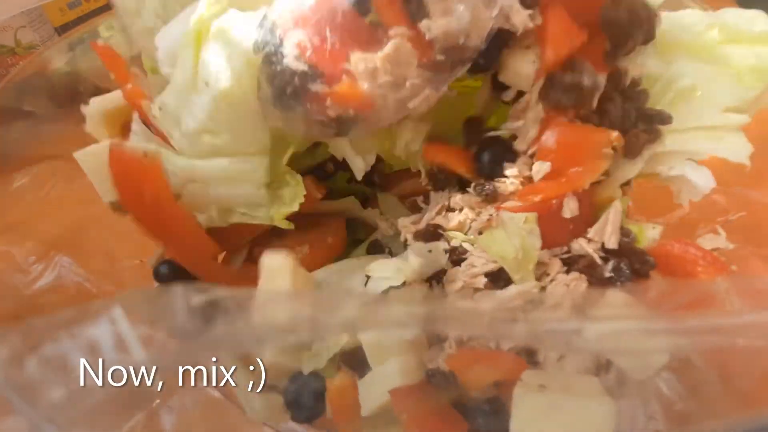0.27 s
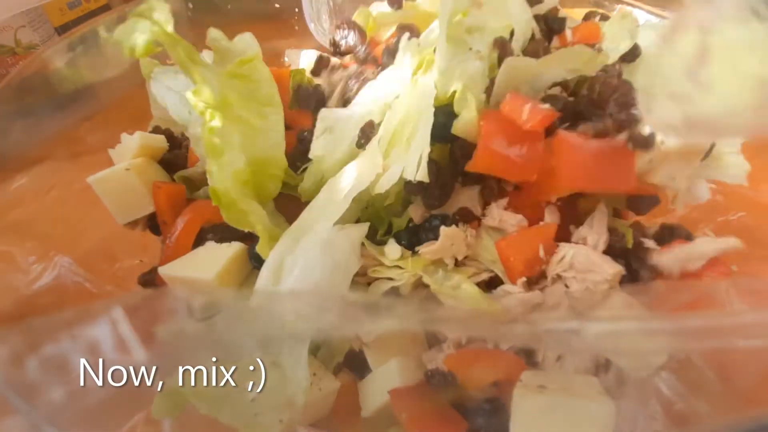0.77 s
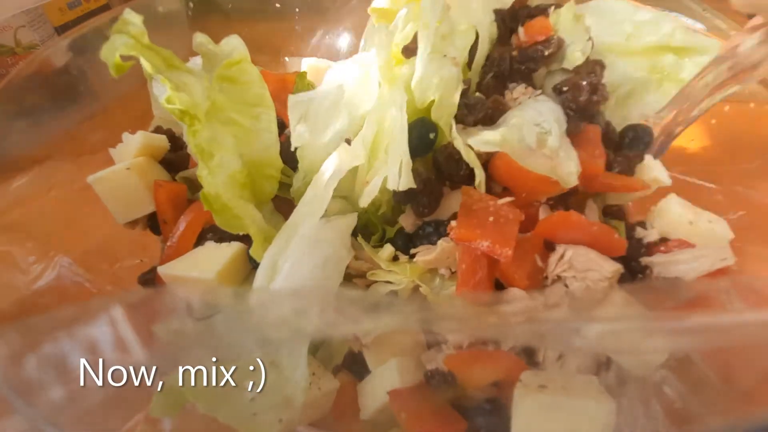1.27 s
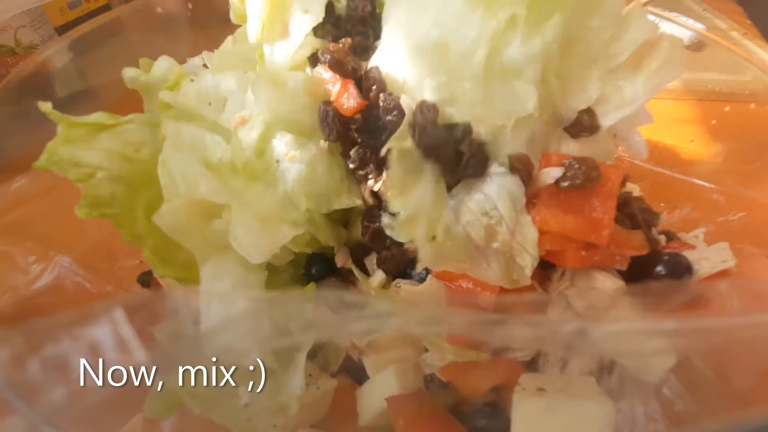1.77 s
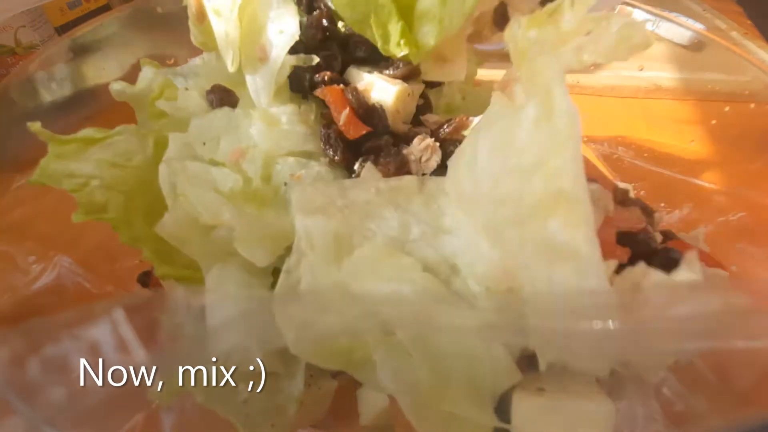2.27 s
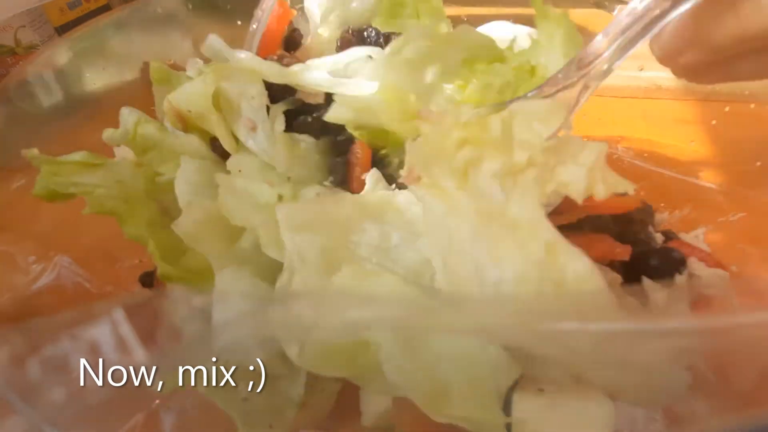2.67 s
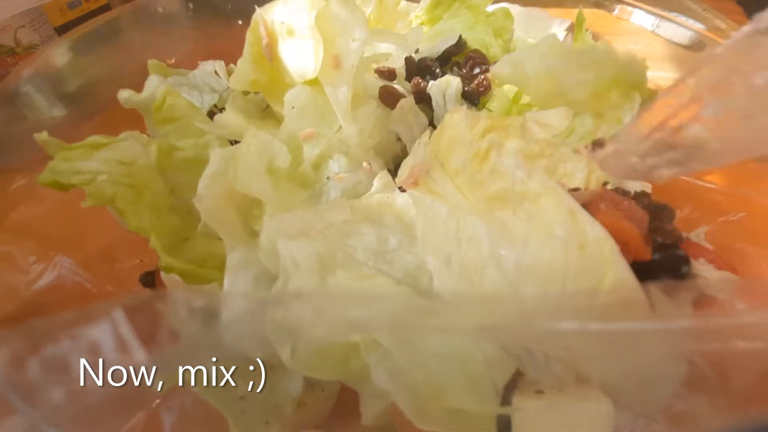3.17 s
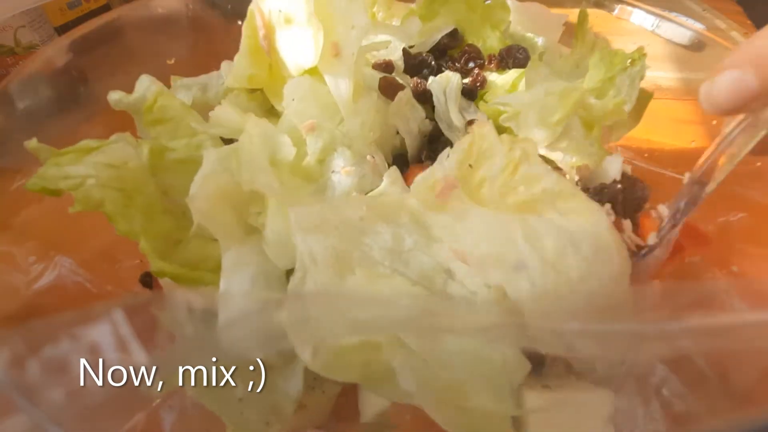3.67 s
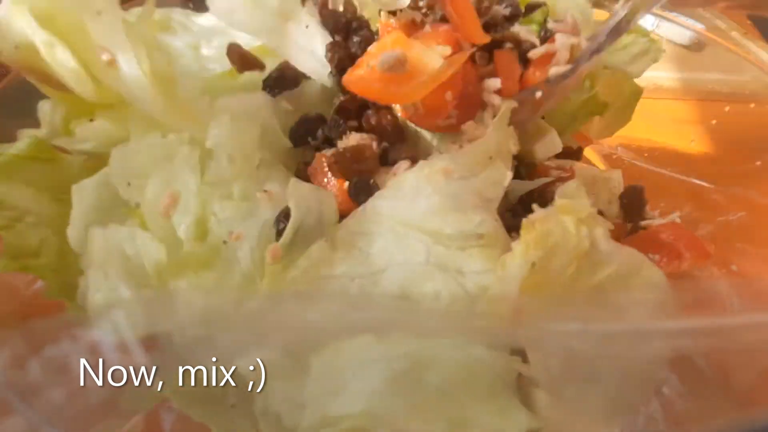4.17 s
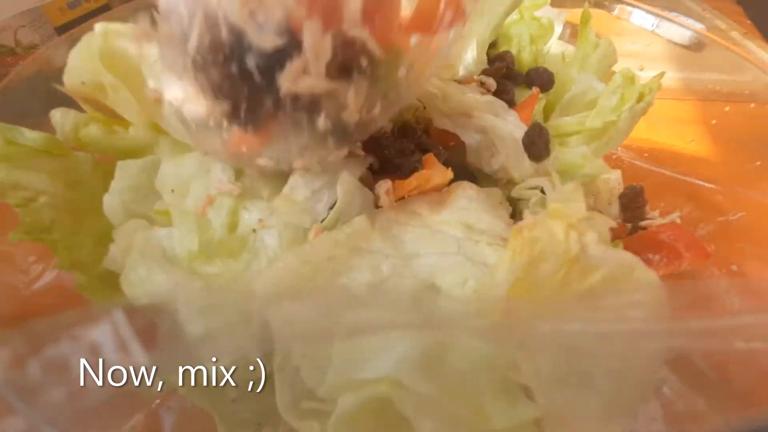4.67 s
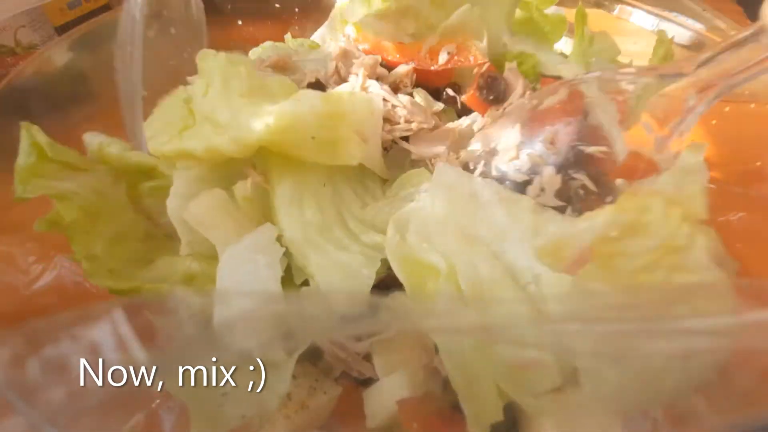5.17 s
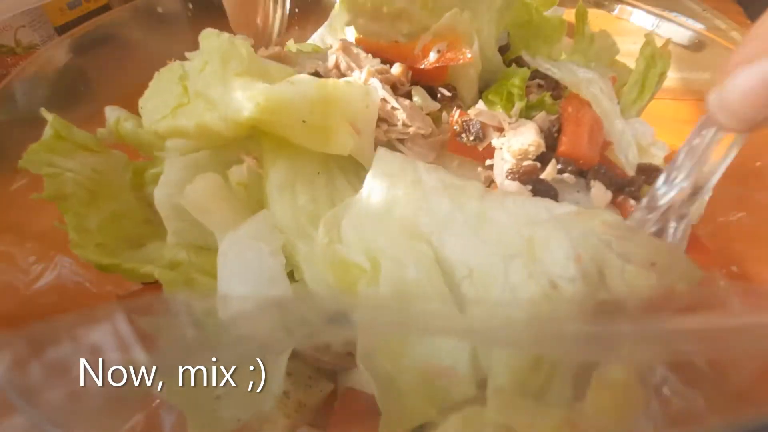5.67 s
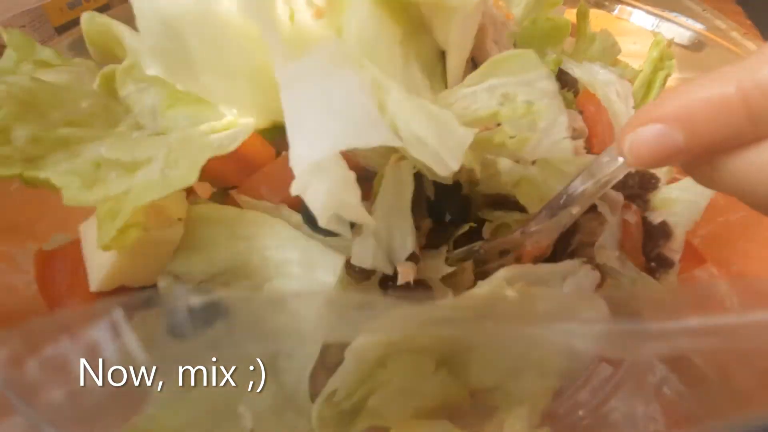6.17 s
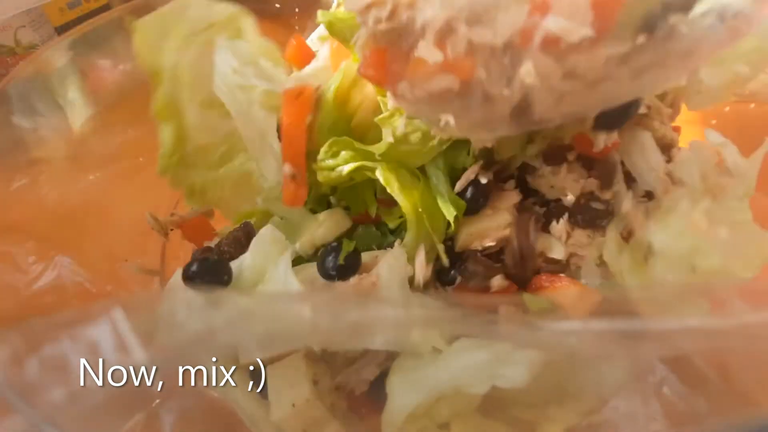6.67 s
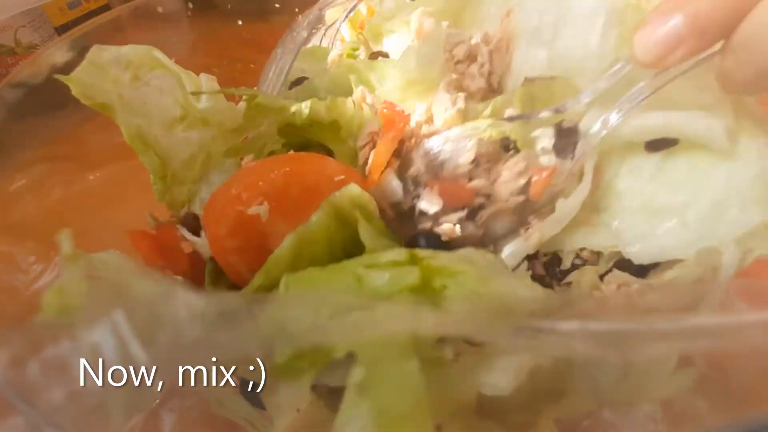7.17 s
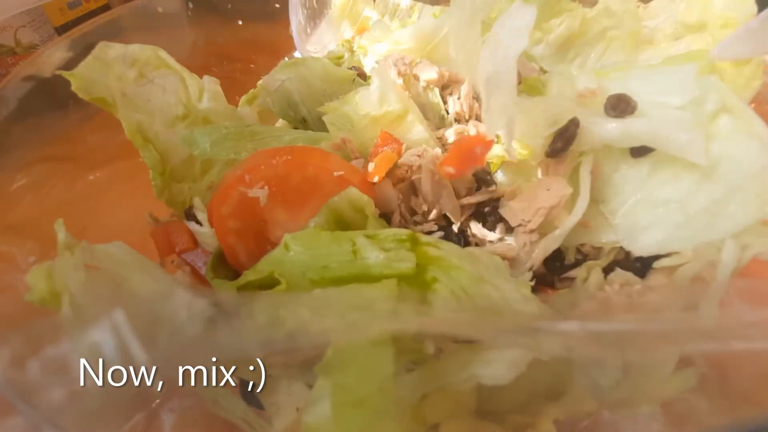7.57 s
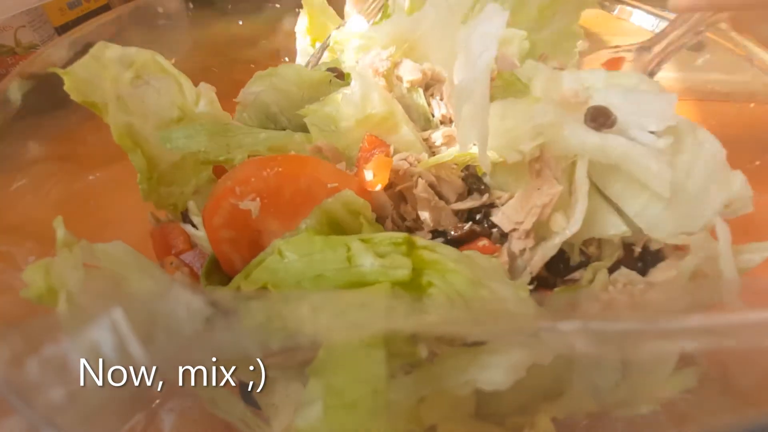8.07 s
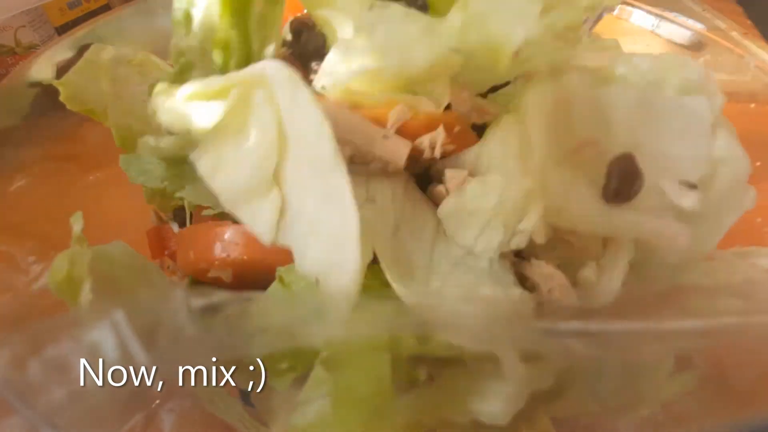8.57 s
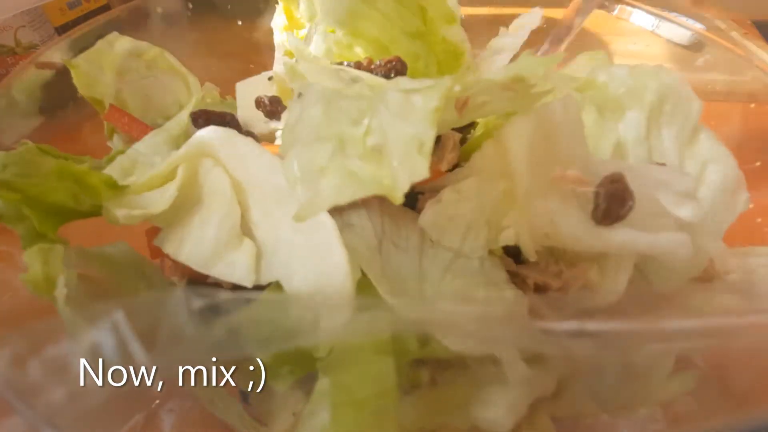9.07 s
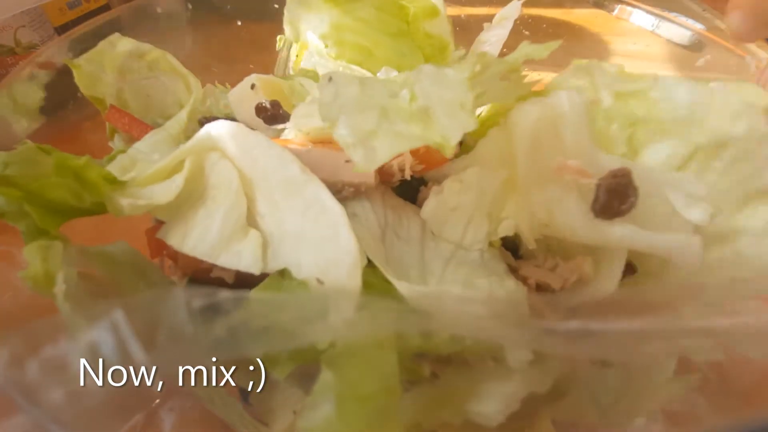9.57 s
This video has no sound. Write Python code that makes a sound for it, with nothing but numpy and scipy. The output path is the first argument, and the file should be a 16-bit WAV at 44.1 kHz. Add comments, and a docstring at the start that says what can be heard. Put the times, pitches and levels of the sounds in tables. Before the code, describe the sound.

Very close stereo pickup of salad being tossed in a big plastic bowl in a small kitchen. Plastic utensils strike the wall with short hollow knocks, loudest near the start, at a third of the way and near the end. Between them, lettuce crackles and snaps slightly to the right, soft pieces drop with dull thuds and edges scrape. A faint low hum lies beneath.

```python
"""Tossing a salad in a plastic bowl

Plastic utensils knock, scrape and squeak on a large plastic bowl, close up in a small kitchen.
The wall is a bank of decaying sines, its boom leaning left; each contact weights the modes differently.
Lettuce, a little to the right, crackles in grains of filtered noise and snaps in sharp noise bursts.
Soft food drops and slides with dull thuds and rumble. A short room tail follows; a faint hum lies below."""
import sys
import numpy as np
from scipy import signal
from scipy.fft import rfft, irfft, next_fast_len
from scipy.io import wavfile

SR = 44100
rng = np.random.default_rng(int(sys.argv[2]) if len(sys.argv) > 2 else 0)


def wav_out(sig):
    """Save sig, one row per channel (or a flat mono array), as 16-bit PCM at SR to the path in sys.argv[1]."""
    wavfile.write(sys.argv[1], SR, np.round(np.clip(np.atleast_2d(sig).T, -1, 1) * 32767).astype(np.int16))


N = 433503
TIME = np.arange(N) / SR


def undb(db):
    """Decibels to gain."""
    return 10 ** (np.asarray(db) / 20)


def unit(x):
    """Scale to rms 1, judged on the mean of the two ears."""
    return x / np.sqrt(np.mean(x.mean(0) ** 2))


def at_level(x, db, span):
    """Set the rms of a hit's first span seconds, judged on the mean of the two ears."""
    return x * undb(db) / np.sqrt(np.mean(x.mean(0)[:int(span * SR)] ** 2))


def add(out, s, x):
    """Mix a sound in at time s."""
    i = max(int(s * SR), 0)
    out[:, i:i + x.shape[1]] += x[:, :N - i]


def fade(t60, length):
    """An exponential decay, length seconds long, falling 60 dB in t60 seconds."""
    return np.exp(-np.log(1000) * TIME[:int(length * SR)] / t60)


def colour(x, points, tilt_db=0):
    """Minimum-phase filter through (Hz, dB) points, plus a tilt in dB per octave."""
    size = 2 * next_fast_len(x.shape[-1] // 2 + 1024, real=True)
    octave = np.log2(np.maximum(np.fft.rfftfreq(size, 1 / SR), 10))
    hz, db = np.transpose(points)
    gain_db = np.interp(octave, np.log2(hz), db + tilt_db * np.log2(hz / hz[0]))
    # 12 dB per octave downwards beyond the outer points
    gain_db -= 12 * np.abs(octave - np.clip(octave, *np.log2(hz[[0, -1]])))
    # folding the cepstrum onto positive time makes the filter causal
    cepstrum = irfft(np.log(undb(gain_db)))[:size // 2]
    cepstrum[1:] *= 2
    response = np.exp(rfft(cepstrum, size))
    return irfft(rfft(x, size) * response, size)[..., :x.shape[-1]]


def pair(size, apart, right_db):
    """Noise for two ears: a shared part and an unrelated part, the right louder by right_db."""
    noise = rng.standard_normal(size) + apart * rng.standard_normal((2, size))
    return noise * undb(np.array([[-right_db], [right_db]]) / 2)


def ring(x, response):
    """Pass a signal through a two-ear impulse response."""
    source = np.atleast_2d(x).astype(np.float32)
    return signal.oaconvolve(source, response.astype(np.float32), axes=1)[:, :N]


def grains(spread_db, count):
    """Impulses at random times; a positive spread makes a few large, a negative one a few small."""
    size_db = spread_db * np.minimum(rng.exponential(size=count), 4)
    size = undb(size_db) * rng.choice([-1, 1], count)
    return np.bincount(rng.integers(0, N, count), size, N)


def crack(points, t60, tail_db, tail_t60, right_db, tilt_db=0):
    """A sharp noise burst with a longer scatter behind it and a small random lag between the ears."""
    shape = fade(t60, length=.1) + undb(tail_db) * fade(tail_t60, length=.1)
    burst = colour(pair(len(shape), apart=0.7, right_db=right_db) * shape, points, tilt_db)
    return np.array([np.roll(ear, rng.integers(16)) for ear in burst])


def effort(moves, attack_s, release_s, rest_db):
    """Gain of (start, length, dB) moves: each swells up to its start, holds and dies away to a rest."""
    power = undb(rest_db) ** 2
    for start, length, db in moves:
        before = np.maximum((start - TIME) / attack_s, 0)
        after = np.maximum((TIME - start - length) / release_s, 0)
        # one unit away is 20 dB down
        power = power + np.exp(np.log(10) * (db / 10 - 2 * np.minimum(before + after, 10)))
    return np.sqrt(power)


# The modes of the bowl's wall.
# Each row: frequency in Hz, relative level in dB before balancing, bare 60 dB decay in seconds.
BOWL_MODES = [(112, -16, 0.061), (134.5, -15, 0.086), (172.6, -5.5, 0.055), (304.5, 8, 0.099),
              (333, -1.5, 0.1), (407, 0, 0.028), (455, -2.5, 0.035), (548.7, -5.5, 0.085), (618, -3, 0.046),
              (705.6, -10, .085), (810, -6.5, 0.053), (887, -8, 0.1), (985, -12, 0.078),
              (1108, -16.5, .055), (1247, -18, 0.052), (1303, -17, .06), (1545, -21, .06), (1775, -23, .05),
              (2060, -29, 0.036), (2260, -30, .04), (2705, -32.5, 0.056)]


def bowl(boom_db, hard_db, scatter_db, detune, wall_db=-6, place_hz=None, free=1):
    """The wall's ring: decaying sines weighted and detuned anew for each contact."""
    hz, db, t60 = np.transpose(BOWL_MODES)
    # the main note lies furthest left, the highest modes nearly in the middle
    right_db = np.interp(hz, [180, 320, 800, 2200], [-12.0, -19.5, -15.5, -1.5])
    weight, shift, turn, side = rng.standard_normal((4, len(hz)))
    # families: boom, main note, middle modes, stiff upper modes
    family = np.digitize(hz, [250, 370, 570])
    # a soft contact hardly reaches the highest modes
    db = db + .25 * min(hard_db - 4.5, 0) * np.log2(np.maximum(hz / 550, 1))
    # the mode that swings most at the place of contact stands out
    if place_hz:
        db = db + 8 * np.exp(-(np.log(hz / place_hz) / .045) ** 2)
    # food lying against the wall chokes the upper modes
    t60 = t60 * np.where(family == family.max(), max(free, .1), 1)
    # a mode starts inwards or outwards, depending on which side of its node is struck
    gain = undb(db + scatter_db * weight) * np.sign(side)
    t = TIME[:SR // 5].astype(np.float32)
    angle = (2 * np.pi * hz * (1 + detune * shift)).astype(np.float32)[:, None] * t
    rate = (-np.log(1000) / t60).astype(np.float32)[:, None]
    onset = 1 - np.exp(-t / 0.00089)
    decay = np.exp(np.maximum(rate * t, -20)) * onset
    left = np.sin(angle) * decay
    # each mode reaches the right ear with its own phase
    right = np.sin(angle + turn[:, None].astype(np.float32)) * decay
    # share the blow's energy among the families, relative to the main note
    for k, share_db in enumerate([boom_db, 0, wall_db, hard_db]):
        early = (gain * (family == k)) @ left[:, :SR // 30]
        gain[family == k] *= undb(share_db) / np.std(early)
    return np.array([gain @ left, gain * undb(right_db) @ right])


# Colour of the hum and its hiss. Each row: frequency in Hz, relative level in dB per Hz.
HUM_COLOUR = [(45, -5), (146, -3), (202, -11), (321, 3), (500, -11.5), (1100, -23), (3010, -39.5),
              (11100, -32.5), (16000, -40)]


def hum(level_db=-66):
    """A faint, even, low hum with a little hiss, made of filtered noise."""
    return unit(colour(pair(N, apart=0.9, right_db=-2.5), HUM_COLOUR)) * undb(level_db)


def kitchen(x):
    """Short reverberation from hard walls nearby: a decaying noise tail fed partly across the ears."""
    shape = fade(t60=.22, length=.4) * (1 - fade(t60=.04, length=.4))
    tail = rng.standard_normal((2, len(shape))) * shape
    tail_colour = [(80, -18), (300, -28.0), (1000, -7.5), (4000, 3), (14000, -13.5)]
    tail = colour(tail / np.sqrt(np.sum(shape ** 2)), tail_colour)
    return ring(0.31 * x + 0.1 * x[::-1], tail)


# Colour of crisp leaf. Each row: frequency in Hz, relative level in dB per Hz.
LEAF_COLOUR = [(300, -15), (1000, 0.5), (2000, -2), (3500, -3), (5500, 0.5), (8500, -4), (12000, -4),
               (16000, -7.5)]
# A bunch of leaves is turned over and slides.
# Each row: start in seconds, length in seconds, level in dB.
RUSTLE_MOVES = [(1.09, 0.088, -64), (1.22, 0.14, -58), (2.51, 0.12, -67.5), (2.70, 0.076, -51.5),
                (3.55, 0.094, -57), (3.99, 0.013, -65), (4.97, 0.067, -56.5), (5.1, 0.11, -66.5),
                (5.48, 0.22, -61), (5.68, 0.41, -66.5), (6.1, 0.33, -73), (6.39, 0.42, -64.5),
                (6.93, 0.27, -58.5), (7.87, 0.031, -50.5), (7.98, 0.085, -55.5), (8.2, 0.086, -67),
                (8.83, 0.13, -63.5), (9.44, 0.36, -64.5), (9.7, 0.15, -63)]


def rustle(count=5):
    """Leaves from limp to stiff crackle in dense tiny grains with sparse larger crinkles among them."""
    crinkle_db, spurt_db = 7, 3  # large crinkles over tiny grains; spread of a leaf's spurts
    jerks_per_s, jerk_db = 55, 3  # rate of the bunch's jerks; their spread
    out = 0
    for stiffness in np.linspace(-1, 1, count):
        tilt_db = 1.1 * stiffness + 0.78
        grain = crack(LEAF_COLOUR, t60=.006, tail_db=-20, tail_t60=.06, right_db=5.5, tilt_db=tilt_db)
        tiny = grains(spread_db=3, count=3000)
        crinkles = undb(crinkle_db) * grains(spread_db=4, count=110)
        # each leaf catches and lets go in its own short spurts
        spurts = np.interp(TIME * 22, np.arange(256), rng.standard_normal(256))
        out = out + unit(ring((tiny + crinkles) * undb(spurt_db * spurts), grain))
    # the whole bunch gives way in jerks with short lulls between
    jerk_points = np.clip(rng.standard_normal(1024), -2, 1.3)
    jerks = np.interp(TIME * jerks_per_s, np.arange(1024), jerk_points)
    # the salad keeps settling quietly between moves; attack and release are times for 20 dB
    turning = effort(RUSTLE_MOVES, attack_s=0.1, release_s=0.11, rest_db=-82.5)
    return unit(out * undb(jerk_db * jerks)) * turning


# Crisp leaf ribs breaking.
# Each row: start in seconds, level in dB, low crunch in dB (more tilts the click darker).
RIB_SNAPS = [(1.2136, -47.5, -8), (1.229, -47.5, 14), (1.259, -57, 16), (1.2897, -44.5, 10.5),
             (1.3203, -41.5, 14), (2.7627, -51, -1), (2.813, -45, 8), (3.559, -47, -5.5),
             (5.02, -47.5, -5.5), (5.4762, -51, -2), (5.6124, -47.5, -9), (5.8933, -49, 7),
             (5.967, -54, -3), (6.0615, -47, 1.5), (6.7555, -50, 5), (6.9198, -55, -14), (6.9538, -51, -7),
             (7.0162, -47, -26), (7.8153, -46.5, -2), (7.831, -48, -21), (7.88, -47, 6), (7.901, -41.5, 0),
             (7.9155, -41.5, -3), (7.9315, -50, -2), (8.001, -45, 5.5), (8.095, -43.5, -7),
             (8.1184, -44.5, -18.5), (8.7914, -51, -1.5), (9.619, -47, -1.5), (9.636, -48, 17),
             (9.6835, -36, 11), (9.6952, -46, 5)]


def snaps():
    """Ribs break with a click of noise; thick ones crunch lower."""
    out = np.zeros((2, N))
    for s, db, low_db in RIB_SNAPS:
        tilt_db = -.36 * (low_db + 2.5)
        click = crack(LEAF_COLOUR, t60=.009, tail_db=-24, tail_t60=.16, right_db=5, tilt_db=tilt_db)
        add(out, s, at_level(click, db, span=0.01))
    return out


# Dull colour of soft food. Each row: frequency in Hz, relative level in dB per Hz.
FOOD_COLOUR = [(65, 2.5), (120, -4.5), (220, -4.5), (450, -12), (900, -32), (2500, -49)]
# Soft pieces dropping back into the bowl.
# Each row: start in seconds, level in dB, boom of the lowest modes in dB over the main note.
FOOD_DROPS = [(0.498, -47, 18.5), (0.699, -45.5, -5.5), (1.147, -33, -7), (2.036, -48.5, -2),
              (3.478, -44, -13), (3.858, -57, -15), (5.168, -41, 7), (5.514, -32, 23), (5.61, -38, -9),
              (6.116, -34, 11.5), (6.22, -38, 3), (6.308, -43, -3), (6.371, -32, 7.5), (6.387, -31, 1.5),
              (6.488, -34.5, 8.5), (6.865, -41, 12), (8.78, -41.5, -17), (9.471, -39, -23),
              (9.499, -38, 14)]


def drops():
    """A soft piece lands with a dull thud, rings mostly the low modes of the wall and rolls over once."""
    hard_db, thud_db = -23, -9  # how little the upper modes ring; the thud against the ring
    out = np.zeros((2, N))
    for s, db, boom_db in FOOD_DROPS:
        tumble_s = rng.uniform(0.026, 0.042)
        for delay, loss_db in [(0, 0), (tumble_s, -11)]:
            body = bowl(boom_db, hard_db, scatter_db=6.0, detune=0.032)
            thud = crack(FOOD_COLOUR, t60=0.054, tail_db=-9.5, tail_t60=0.095, right_db=-11.5, tilt_db=-2.5)
            add(out, s + delay, at_level(body, db + loss_db, span=.02))
            add(out, s + delay, at_level(thud, db + loss_db + thud_db, span=.02))
    return out


# The ring of a utensil. Each row: frequency in Hz, relative level in dB, 60 dB decay in seconds.
UTENSIL_MODES = [(580, 9.5, 0.028), (1477, -1, 0.03), (2335, 1, 0.031), (3200, -21, 0.013)]
# The two utensils touch each other. Each row: start in seconds, level in dB.
UTENSIL_CLACKS = [(5.543, -39), (6.104, -49.5), (6.176, -57), (7.815, -57), (9.684, -50.5)]


def clacks():
    """Hollow plastic utensils tap together: a few decaying sines and a short rasp of noise."""
    detune, rasp_db = 0.084, -4  # relative mode shift; rasp against the ring
    rasp_colour = [(500, -8), (1500, 0), (3200, -1), (5000, -12)]
    out = np.zeros((2, N))
    hz, db, t60 = np.transpose(UTENSIL_MODES)[:, :, None]
    t = TIME[:SR // 10]
    for s, level_db in UTENSIL_CLACKS:
        # the grip and the point of contact shift the ring from tap to tap
        loaded_hz = hz * (1 + detune * rng.standard_normal(hz.shape))
        weight = undb(db + 1.2 * rng.standard_normal(db.shape)) * np.exp(-np.log(1000) * t / t60)
        ears = []
        for _ in range(2):
            phase = rng.standard_normal(hz.shape)
            ears.append(np.sum(weight * np.sin(2 * np.pi * loaded_hz * t + phase), axis=0))
        tap = np.array(ears) * np.minimum(t / .001, 1)
        add(out, s, at_level(tap, level_db, span=.01))
        rasp = crack(rasp_colour, t60=.025, tail_db=-16, tail_t60=.08, right_db=0)
        add(out, s, at_level(rasp, level_db + rasp_db, span=.01))
    return out


# The utensil's edge squeaks on the wet wall.
# Each row: start in seconds, length in seconds, centre frequency in Hz, level in dB.
EDGE_SQUEAKS = [(7.821, 0.044, 1303, -47.5), (7.862, .032, 856, -45), (9.39, 0.038, 805, -45)]


def squeaks(waver=.015):
    """A dragged edge makes the wall sing briefly: one sine with a wandering pitch."""
    out = np.zeros((2, N))
    for s, length, hz, db in EDGE_SQUEAKS:
        along = np.linspace(0, 1, int(length * SR))
        drift = np.interp(along, np.linspace(0, 1, 8), rng.standard_normal(size=8))
        phase = 2 * np.pi * np.cumsum(hz * (1 + waver * drift)) / SR
        tone = np.sin(phase) * np.sqrt(np.abs(np.sin(np.pi * along)))
        add(out, s, at_level(np.array([tone, tone / 2]), db, span=length))
    return out


# Colour of a scraping edge. Each row: frequency in Hz, relative level in dB per Hz.
SCRAPE_COLOUR = [(250, -16), (550, 6), (850, -3), (1200, -6.5), (1600, -12), (2400, -16.5), (3400, -28)]


def judder(slip_hz=335, db=-34, boom_db=-12, hard_db=-11, grit_db=-12):
    """Plastic sticks and slips: a brief uneven pulse train with noisy grit makes the bowl groan."""
    start, length = 8.18, .068  # seconds
    slips = np.cumsum(1 + .045 * rng.standard_normal(size=64)) / slip_hz
    size = int(length * SR)
    pulses = np.bincount((slips[slips < length] * SR).astype(int), minlength=size)[:size]
    swell = np.sin(np.linspace(0, np.pi, size))
    force = (pulses / pulses.std() + rng.standard_normal(size)) * swell
    wall = bowl(boom_db, hard_db, scatter_db=1, detune=0)
    edge = crack(SCRAPE_COLOUR, t60=.009, tail_db=-17, tail_t60=.05, right_db=-6)
    out = np.zeros((2, N))
    for response, level_db in [(wall, db), (edge, db + grit_db)]:
        groan = signal.fftconvolve(force[None], response, axes=1)
        add(out, start, at_level(groan, level_db, span=length))
    return out


# The utensils push food along the wall.
# Each row: start in seconds, length in seconds, rumble level in dB, scrape level in dB.
PUSH_STROKES = [(0.233, 0.38, -55.5, -79), (1.071, 0.12, -39, -51), (1.254, 0.22, -51, -60.5),
                (1.714, 0.28, -58, -70.5), (2.73, 0.096, -55, -49), (3.474, .2, -54, -59),
                (3.849, 0.19, -71, -62.5), (4.134, 0.33, -71, -73.5), (5.156, 0.13, -54.5, -71.5),
                (5.465, 0.22, -46, -56.5), (5.72, 0.38, -56.5, -56.5), (6.117, 0.16, -45, -62),
                (6.381, 0.18, -47, -66), (6.657, 0.15, -40.5, -54), (6.853, 0.21, -46.5, -69),
                (7.181, 0.068, -46, -52), (7.406, 0.038, -52.5, -81.5), (7.821, 0.086, -45.5, -45),
                (7.963, 0.35, -50.5, -56), (8.384, 0.36, -58.5, -69), (9.39, 0.088, -44.5, -50.5),
                (9.71, 0.042, -49, -49.5)]


def pushing(count=2):
    """Soft pieces bump along the wall and make it rumble; the edge catches and rings the upper modes."""
    attack_s, release_s = 0.052, 0.081  # time to rise and to fall by 20 dB
    rumble_moves = [(s, length, db) for s, length, db, _ in PUSH_STROKES]
    scrape_moves = [(s, length, db) for s, length, _, db in PUSH_STROKES]
    # the salad keeps settling quietly between strokes
    weight = effort(rumble_moves, attack_s, release_s, rest_db=-69)
    grip = effort(scrape_moves, attack_s, release_s, rest_db=-83)
    rumble, scrape = 0, 0
    for _ in range(count):
        wall = bowl(boom_db=0, hard_db=-15, scatter_db=1.5, detune=.01)
        rumble = rumble + unit(ring(grains(spread_db=2.0, count=450), wall))
        catches = grains(spread_db=3.5, count=500)
        edge = crack(SCRAPE_COLOUR, t60=.025, tail_db=-18, tail_t60=.07, right_db=-3.5)
        upper = bowl(boom_db=-24.0, hard_db=9.5, scatter_db=7.5, detune=0.028)
        scrape = scrape + unit(ring(catches, edge)) + undb(-3) * unit(ring(catches, upper))
    # the food itself bumps dully, with no ring
    bump = crack(FOOD_COLOUR, t60=0.029, tail_db=-15.5, tail_t60=0.071, right_db=-10.5)
    bumps = unit(ring(grains(spread_db=-1.0, count=1200), bump))
    rumble = unit(rumble) + undb(-1.5) * bumps
    return unit(rumble) * weight + unit(scrape) * grip


# Colour of the contact tick. Each row: frequency in Hz, relative level in dB per Hz.
TICK_COLOUR = [(500, 2), (1500, 5), (2600, 3), (3800, -6), (5800, 4), (8000, -2), (11200, 6), (16000, -3)]
# Utensils hitting the bowl.
# Each row: start in seconds, level of the ring in dB, boom of the lowest modes in dB, middle modes in dB,
# hardness (upper modes) in dB, all three over the main note, contact tick level in dB,
# mode at the place of contact in Hz, freedom of the upper modes to ring (1 bare, near 0 covered with food).
BOWL_KNOCKS = [(0.296, -30.5, -17, -10.5, -7.5, -85, 620, 0.62),
               (0.363, -34.5, 4.5, -4, -2.5, -85, 617, 0.87), (0.86, -13, -0.5, 0.5, 1.5, -28, 720, 0.99),
               (1.093, -29.5, -3, -10, -8.5, -51.5, 810, 1), (1.179, -28.5, 2.5, 0, -3.5, -51, 810, 1.4),
               (1.747, -42, 5.5, -1.5, 1.5, -86, 616, 0.46), (2.337, -40, -10.5, -4, -21.5, -90, 455, 0.39),
               (3.321, -12, 2.5, 2, 3, -32, 890, 0.73), (3.405, -15, -4.5, -9.5, -2.5, -57, 810, 0.54),
               (5.487, -33.5, 7, 2, -3.5, -68, 810, 0.36), (5.542, -28, -6.5, -14.5, -19, -46.5, 303, 0.78),
               (6.635, -20, 2.5, -15.5, -10, -78, 810, 1), (6.731, -32.5, -17, -23, -12.5, -88, 305, 0.65),
               (7.22, -38.5, -16, -17, -7.5, -75, 810, 0.86), (7.781, -24.5, 4, 3, 5, -45, 1303, 1),
               (8.629, -30, -5, -1, -5.5, -62, 1030, 0.16),
               (9.3436, -13, -3.5, -9.5, -5.5, -29, 1545, 1.14)]


def knocks():
    """A contact ticks, thuds through the food and rings the bowl; the utensil then chatters briefly."""
    out = np.zeros((2, N))
    for s, db, boom_db, wall_db, hard_db, tick_db, place_hz, free in BOWL_KNOCKS:
        wall = bowl(boom_db, hard_db, scatter_db=1.5, detune=0.015, wall_db=wall_db, place_hz=place_hz, free=free)
        body = at_level(wall, db, span=0.014)
        add(out, s, body)
        # chatter: two faint repeats
        for delay in rng.uniform(.015, 0.039, size=2):
            add(out, s + delay, undb(-19.5) * body)
        thud = crack(SCRAPE_COLOUR, t60=0.12, tail_db=-18.0, tail_t60=0.13, right_db=-1.0, tilt_db=-1.0)
        add(out, s, at_level(thud, db + hard_db - 16.0, span=0.014))
        # the tick comes just ahead of the ring
        tick = crack(TICK_COLOUR, t60=.014, tail_db=-12, tail_t60=.1, right_db=6.5)
        add(out, s - .0015, at_level(tick, tick_db, span=0.0054))
    return out


def scene():
    """The salad, the bowl and the room, over the hum."""
    lettuce = rustle() + snaps()
    food = drops() + pushing()
    utensils = clacks() + squeaks() + judder() + knocks()
    near = lettuce + food + utensils
    return hum() + kitchen(near) + near


def record(dry):
    """The microphone sheds the deepest bass, stops at full scale and cuts the top above 16 kHz."""
    bass_cut = signal.butter(2, 68, "highpass", fs=SR, output="sos")
    top_cut = signal.ellip(8, .2, 70, 16000, fs=SR, output="sos")
    thin = signal.sosfilt(bass_cut, dry)
    return signal.sosfilt(top_cut, np.clip(thin, -1, 1))


dry = scene()
out = record(dry)
wav_out(out)
```